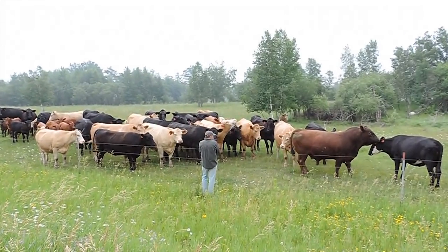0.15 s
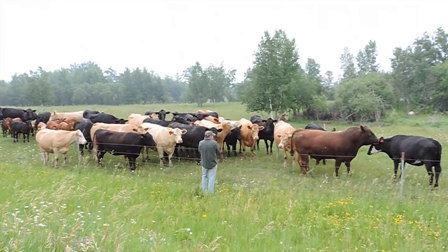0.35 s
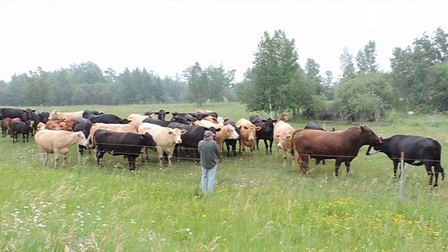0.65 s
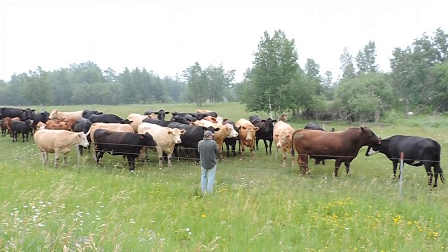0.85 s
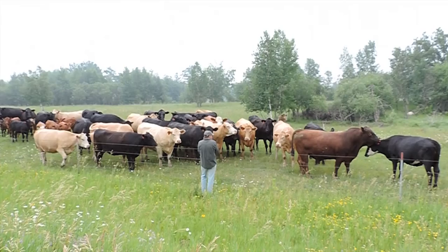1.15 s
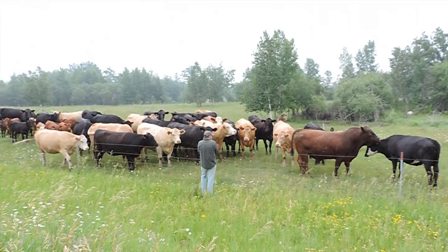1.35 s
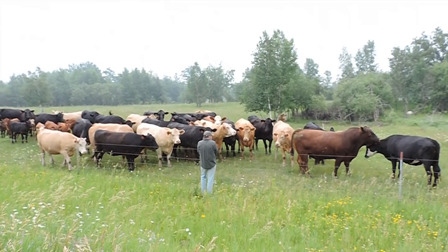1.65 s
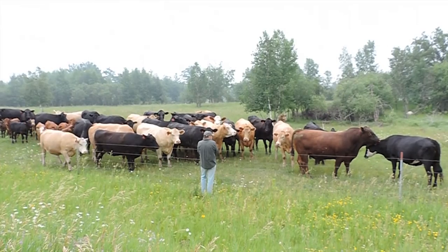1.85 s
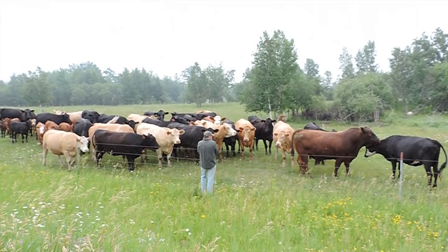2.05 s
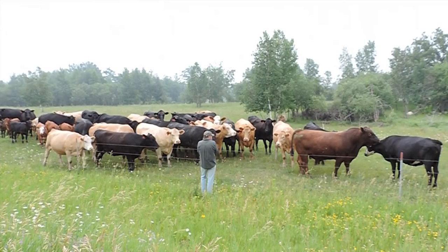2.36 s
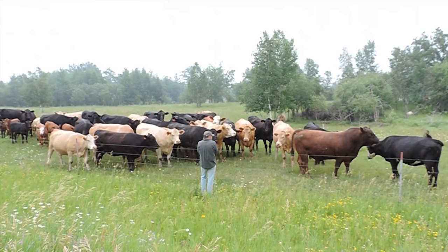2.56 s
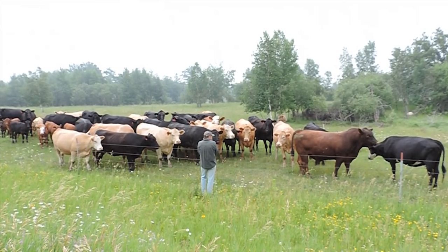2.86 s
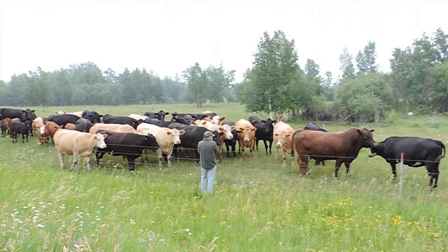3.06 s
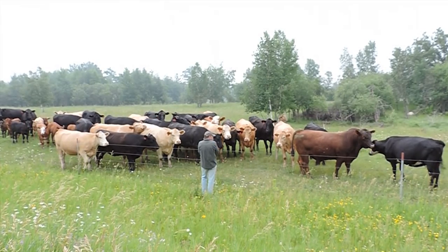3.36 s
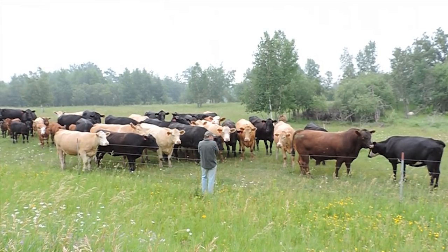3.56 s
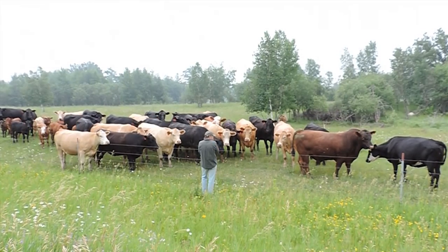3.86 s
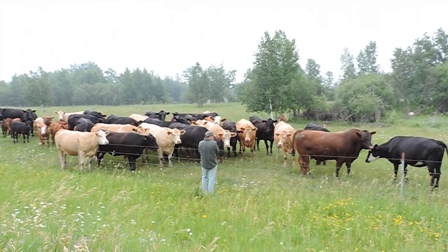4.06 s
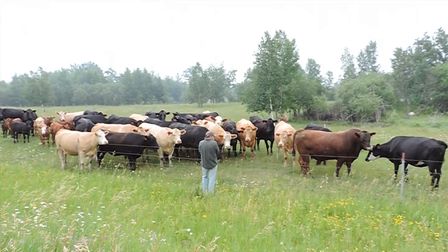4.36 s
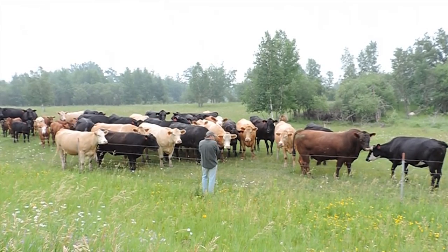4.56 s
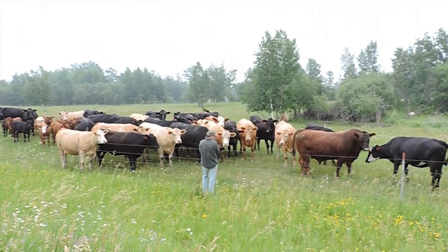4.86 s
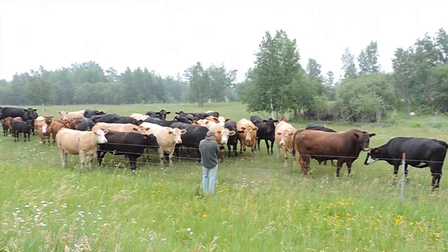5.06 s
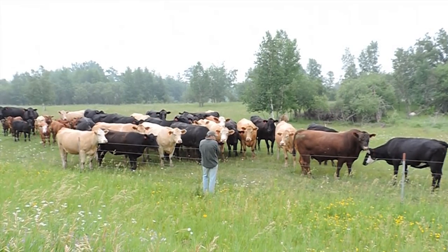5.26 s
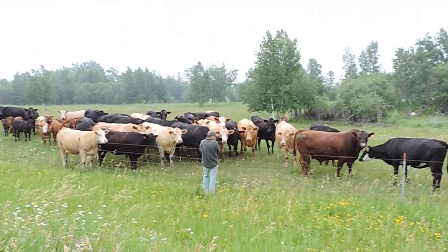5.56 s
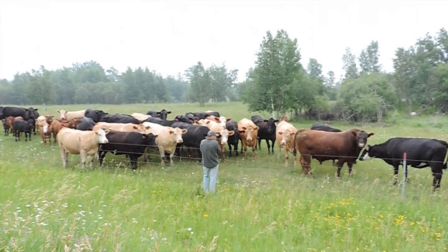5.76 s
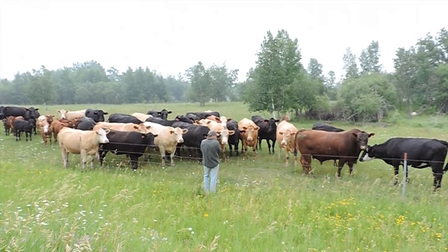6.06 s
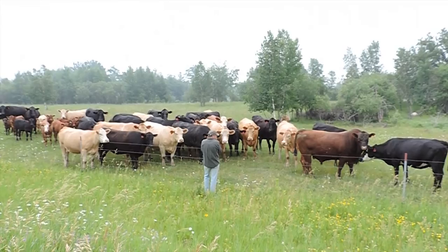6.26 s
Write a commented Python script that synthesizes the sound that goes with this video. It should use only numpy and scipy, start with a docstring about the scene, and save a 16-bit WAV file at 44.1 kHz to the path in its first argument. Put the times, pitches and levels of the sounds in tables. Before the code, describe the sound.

A quiet open pasture, heard in stereo from some distance, lasts a little over six seconds. Soft low air, a fine leafy hiss and a barely present low drone continue throughout. At 0.2-0.45 s come faint hoarse bird calls on the right and a tiny hoof crunch. At 1.27 s a dull hoof step falls, and a cow hums very low and faintly until about 2.35 s. Thin high whistles at 1.06, 1.4 and 1.8 s lead to bright upward slurs at 1.9-2.15 s. A rasping note and evenly spaced falling chips run from 2 to 3.05 s, with two soft rising blips, then hoarse calls and a distant buzz until 3.65 s. From 4.03 s a moo climbs nasally, opens near 4.8 s, bellows loudest around 5.3-5.9 s, and drops in a creaky grunt by 6.09 s. A light echo, hoarse huff and bird calls finish.

```python
"""Summer pasture: a standing herd, a soft wash of air and leaves, small birds, a faint echo off the tree line.
A cow hums very low; later a long moo climbs, opens into a loud bellow and drops away as the mouth shuts.
Cow voices are sums of harmonics shaped by nose and mouth; bird notes are gliding, trembling sines.
Air is shaped noise plus a low sine; hooves are damped noise bursts; the echo is sparse decaying taps."""
import sys
import numpy as np
from scipy import signal
from scipy.io import wavfile
from scipy.ndimage import uniform_filter1d, map_coordinates

SR = 44100
rng = np.random.default_rng(int(sys.argv[2]) if len(sys.argv) > 2 else 0)


def to_wav(sig):
    """Store sig (one row per channel, or 1-D mono) as 16-bit WAV at the path in sys.argv[1].

    Samples outside -1..1 are clipped; the rate is SR.
    """
    pcm = np.clip(np.atleast_2d(sig), -1, 1) * 32767
    pcm = np.round(pcm).astype(np.int16)
    wavfile.write(sys.argv[1], SR, pcm.T)  # frames by channels


N = 282681


def gain_of(db):
    """Decibels to amplitude."""
    return 10 ** (np.asarray(db) / 20)


def evened(x):
    """Scales to rms 1."""
    return x / np.sqrt(np.mean(x ** 2) + 1e-20)


def read(points, hz):
    """Reads a spectrum on a log-frequency axis."""
    f, value = np.transpose(points)
    return np.interp(np.log(hz + 1), np.log(f + 1), value)


def follow(rows, t):
    """Reads every column of a curve table at the times t."""
    s, *columns = np.transpose(rows)
    return [np.interp(t, s, column) for column in columns]


def add(mix, s, sound):
    """Mixes a sound in at time s."""
    part = mix[..., round(s * SR):][..., :sound.shape[-1]]
    part += sound[..., :part.shape[-1]]


def drift(size, rate_hz):
    """Smooth random wavering of rms 1, with 2 * rate_hz random knots a second."""
    knots = rng.standard_normal(4096)
    at = np.arange(size) * 2 * rate_hz / SR
    return evened(map_coordinates(knots, [at], order=2, mode="wrap"))


def phase(hz):
    """Running phase of a varying frequency, rad."""
    return 2 * np.pi * np.cumsum(hz) / SR


def panned(sound, pan_db):
    """Level difference left minus right, split between both sides."""
    return gain_of([[pan_db / 2], [-pan_db / 2]]) * sound


# left-right likeness of the air: f/Hz, correlation/1
LIKENESS = [(25, .9), (60, 1), (110, 0.75), (190, 0.77), (340, 0.67), (620, 0.66), (1110, 0.47),
            (1980, 0.6), (3550, 0.13), (6350, 0.51), (11400, 0.53)]


def wash(spectrum, db, patch_db, size):
    """Steady noise with drifting time-frequency patches, partly alike in both ears."""
    hop, hz = size // 4, np.fft.rfftfreq(size, 1 / SR)
    a, b, c, d, patches = rng.standard_normal((5, len(hz), N // hop + 5))
    patches = uniform_filter1d(patches, size=8, axis=0)
    patches = evened(uniform_filter1d(patches, size=8, axis=1))
    same = np.clip(read(LIKENESS, hz), -1, 1)[:, None]
    left = a + 1j * b
    right = same * left + np.sqrt(1 - same ** 2) * (c + 1j * d)
    z = np.array([left, right]) * gain_of(read(spectrum, hz)[:, None] + patch_db * patches)
    noise = signal.istft(z, nperseg=size, noverlap=size - hop)[1][:, :N]
    return gain_of(db) * evened(noise)


def drone(hz=58.8, db=-67):
    """A faint low sine, barely wavering in pitch."""
    return gain_of(db) * evened(np.sin(phase(hz + .5 * drift(N, 2.6))))


# spectrum shape of the low air: f/Hz, relative density/dB per Hz
AIR_SHAPE = [(12, -27), (20, 0.5), (32, -6), (65, -4), (81, -3.5), (185, -5.5), (223, -6.5), (253, -8.5),
             (908, -12.5), (988, -11.5), (1220, -13.5), (2190, -17), (2650, -18), (3000, -21),
             (3900, -58.5), (6600, -120)]
# spectrum shape of the high hiss: f/Hz, relative density/dB per Hz
HISS_SHAPE = [(2600, -32), (3100, 0.5), (4000, -1), (4800, -5), (5400, -0.5), (5850, -2), (6150, -7.5),
              (8000, -9), (11500, -11.5)]


def open_air():
    """Low wash, finer-grained high hiss and drone."""
    low = wash(AIR_SHAPE, db=-57.5, patch_db=2.06, size=4096)
    high = wash(HISS_SHAPE, db=-66.5, patch_db=2.0, size=512)
    return low + high + drone()


# echo strength of the tree line: f/Hz, relative level/dB
ECHO_LEVEL = [(100, -18.5), (200, -18.5), (450, -24), (800, -14.5), (1200, -9), (3000, -6), (8000, -13.5)]
# echo decay: f/Hz, t60/s
ECHO_DECAY = [(150, 0.57), (900, 3.53), (3000, 5.4), (8000, .7)]


def tree_line(x, spread=0.15, slot=20):
    """Sparse reflections, one random-sign tap per slot of samples; each band dies at its own speed."""
    taps = np.zeros((2, 2 * SR))
    at = np.arange(900, 2 * SR - slot, slot)
    shape = (2, len(at))
    np.put_along_axis(taps, at + rng.integers(0, slot, shape), rng.choice([-1., 1.], shape), 1)
    hz, t, z = signal.stft(taps, SR, nperseg=256)
    t60_s = read(ECHO_DECAY, hz)[:, None]
    energy = SR / slot * t60_s / np.log(10 ** 6)  # of an endless decay
    z = z * np.exp(-np.log(1000) * t / t60_s) / np.sqrt(energy)
    z = z * gain_of(read(ECHO_LEVEL, hz))[:, None]
    response = signal.istft(z, SR, nperseg=256)[1]
    mid, side = signal.fftconvolve(x[None], response, axes=1)[:, :N]
    return np.array([mid + spread * side, mid - spread * side])


def foliage(x, sway_hz=10):
    """Swaying leaves keep shifting the echo between three paths."""
    weights = np.array([drift(N, sway_hz) for _ in range(3)])
    weights /= np.sqrt(np.sum(weights ** 2, 0) + 0.035)
    return sum(weight * tree_line(x) for weight in weights)


def note(length_s, hz, db, glide, rasp):
    """Sine gliding through hz by a log share of its pitch; a fast pitch tremble (rms share) makes it raspy."""
    u = np.linspace(-.5, .5, int(length_s * SR))
    pitch_hz = hz * np.exp(glide * u) * (1 + rasp * drift(len(u), 350))
    tone = np.sin(phase(pitch_hz)) * signal.windows.tukey(len(u), .6)
    return gain_of(db) * evened(tone)


# distant buzzing song: t/s, length/s, f/Hz, level/dB, throb/Hz, left-right/dB
BUZZ_NOTES = [(3.22, .35, 5150, -73, 42, -2), (3.25, .41, 2720, -68, 42, -6)]


def buzzes():
    """Held tones chopped into quick pips by a squared sine."""
    out = np.zeros((2, N))
    for s, length_s, hz, db, throb_hz, pan_db in BUZZ_NOTES:
        t = np.arange(int(length_s * SR)) / SR
        tone = np.sin(phase(hz * (1 + .008 * drift(len(t), 200))))
        pips = np.sin(np.pi * throb_hz * t) ** 2
        sound = gain_of(db) * evened(tone * pips * signal.windows.tukey(len(t), .1))
        add(out, s, panned(sound, pan_db))
    return out


# hoarse calls: t/s, length/s, f/Hz, level/dB, glide/1
HOARSE_CALLS = [(0.195, 0.032, 2980, -76, -.08), (0.304, .15, 2653, -67.5, -.15),
                (2.568, 0.018, 2700, -68.5, -0.12), (2.911, 0.047, 1543, -67.5, -0.024),
                (2.971, 0.071, 2440, -63, -.07), (3.164, 0.02, 2560, -66, -.06),
                (5.922, 0.039, 3730, -70, -.18), (6.233, 0.098, 2710, -66.5, -.33),
                (6.301, .105, 2920, -69, .32)]


def bird_calls():
    """Short raspy glides, off to the right."""
    out = np.zeros((2, N))
    for s, length_s, hz, db, glide in HOARSE_CALLS:
        add(out, s, panned(note(length_s, hz, db, glide, rasp=0.05), pan_db=-10.5))
    return out


def chips(count=7, start_s=2.273, gap_s=.1222, first_db=-66.5, fade_db=-.5, scatter_db=2):
    """A rasping note leads into evenly spaced falling chips, fading with some scatter in strength."""
    out = np.zeros(N)
    add(out, 2, note(length_s=0.5, hz=4901, db=-74, glide=0, rasp=0.042))
    for i in range(count):
        db = first_db + i * fade_db + scatter_db * rng.standard_normal()
        add(out, start_s + i * gap_s, note(length_s=.028, hz=5040, db=db, glide=-0.254, rasp=0.0043))
    return out


# thin, nearly level whistles: t/s, length/s, f/Hz, level/dB, left-right/dB
WHISTLE_NOTES = [(1.059, .12, 7060, -70, -11), (1.421, .17, 6980, -69.5, -7),
                 (1.82, 0.133, 6900, -66.5, -2)]


def whistles():
    """Nearly pure tones open a small bird's song."""
    out = np.zeros((2, N))
    for s, length_s, hz, db, pan_db in WHISTLE_NOTES:
        add(out, s, panned(note(length_s, hz, db, glide=0.0154, rasp=.002), pan_db))
    return out


# upward slurs: t/s, f/Hz, level/dB, glide/1
SLUR_NOTES = [(1.922, 7980, -57, .28), (2.031, 8440, -61, .15)]
SLUR_S, SLUR_RASP = .11, 0.021
FLICK_S, FLICK_PITCH_RATIO, FLICK_REL_DB = .016, 1.2, -18


def slurs():
    """Upward glides end the song, each closing on a faint higher flick."""
    out = np.zeros(N)
    for s, hz, db, glide in SLUR_NOTES:
        add(out, s, note(SLUR_S, hz, db, glide, SLUR_RASP))
        flick = note(FLICK_S, hz * FLICK_PITCH_RATIO, db + FLICK_REL_DB, 0, SLUR_RASP)
        add(out, s + SLUR_S - FLICK_S, flick)
    return out


def songbirds():
    """All bird sounds, stereo."""
    return buzzes() + bird_calls() + chips() + whistles() + slurs()


# hoof steps: t/s, level before decay/dB, f/Hz, noise width/Hz, decay/s
HOOF_STEPS = [(.311, -49, 970, 640, 0.0076), (.323, -50, 1066, 715, 0.0058), (1.271, -45, 146, 139, 0.0082),
              (1.275, -60.5, 4250, 890, 0.017)]


def hooves():
    """Hoof on turf: a band of noise, quick onset, exponential damping."""
    out = np.zeros(N)
    t = np.arange(SR // 8) / SR
    for s, db, hz, width_hz, decay_s in HOOF_STEPS:
        crunch = drift(len(t), width_hz / 2) * np.cos(2 * np.pi * hz * t)
        crunch = crunch + drift(len(t), width_hz / 2) * np.sin(2 * np.pi * hz * t)
        damping = np.exp(-t / decay_s) * (1 - np.exp(-t / 0.00029))
        add(out, s, gain_of(db) * evened(crunch) * damping)
    return out


# soft rising blips from the herd: t/s, f/Hz, level/dB
BLIP_NOTES = [(2.317, 306, -59.5), (2.511, 366, -56)]


def blips_and_huff():
    """Two short rising notes, and one hoarse huff after the moo."""
    out = np.zeros(N)
    for s, hz, db in BLIP_NOTES:
        add(out, s, note(length_s=0.041, hz=hz, db=db, glide=0.55, rasp=0.022))
    add(out, 6.198, note(length_s=.055, hz=546, db=-52, glide=-0.072, rasp=0.0973))
    return out


# closed-mouth call: t/s, f/Hz, level before level_db/dB
MURMUR_CURVE = [(1.27, 57.9, -57), (1.358, 58.2, -69), (1.39, 58.8, -56.5), (1.622, 62.6, -61.5),
                (1.906, 63.06, -56.5), (1.974, 62, -63.5), (2.14, 61.6, -55.5), (2.36, 60.7, -66)]


def murmur(level_db=1, overtones_db=(0, -19, -19, -23, -27, -24), jitter=0.01):
    """A low hum through the nose, nearly all fundamental."""
    t = np.arange(MURMUR_CURVE[0][0], MURMUR_CURVE[-1][0], 1 / SR)
    pitch_hz, db = follow(MURMUR_CURVE, t)
    angle = phase(pitch_hz * (1 + jitter * drift(len(t), 14.0)))
    hum = sum(gain_of(d) * np.cos((k + 1) * angle) for k, d in enumerate(overtones_db))
    return t[0], gain_of(db + level_db) * evened(hum) * signal.windows.tukey(len(t), .1)


def formant(hz, centre_hz, width_hz, steepness=4):
    """Shares of power that a steep resonance gives to the harmonics (rows)."""
    power = 1 / (1 + ((hz - centre_hz) / width_hz) ** 2) ** steepness
    return power / power.sum(0)


def notch(hz, centre_hz, width_hz, depth_db):
    """Gain of an antiresonance."""
    return gain_of(depth_db * np.exp(-((hz - centre_hz) / width_hz) ** 2))


def swell(t, s, half_length_s, db):
    """A smooth rise and fall of level around the time s, dB."""
    return db * np.exp(-((t - s) / half_length_s) ** 2)


# pitch and nasal fundamental: t/s, f/Hz, level/dB
MOO_CURVE = [(4.03, 60.47, -71), (4.14, 71.23, -51.5), (4.27, 80.9, -47.5), (4.38, 88.4, -45),
             (4.64, 128.8, -45.5), (4.73, 142.3, -41.5), (4.8, 162, -37), (4.84, 164.8, -34.5),
             (4.94, 173.4, -35.5), (5.0, 176.6, -32.5), (5.33, 193.5, -24), (5.55, 195.7, -22.5),
             (5.87, 190.5, -24.5), (5.97, 176.8, -30.5), (6.0, 163.5, -32.5), (6.04, 117.8, -44),
             (6.05, 110, -41.5), (6.09, 93, -62)]
# overtone prominence as the mouth widens and narrows: t/s, level/dB
BRIGHTNESS_CURVE = [(4.03, -4), (4.35, -9.5), (4.62, -2.5), (4.8, -2), (4.95, 2), (5.36, -5.5), (5.6, -18),
                    (5.78, -10), (5.94, -0.5), (6.02, -3)]
# main formant, rising as the jaw drops: t/s, f/Hz
JAW_CURVE = [(4.3, 680), (4.8, 680), (4.89, 742), (5.05, 703), (5.4, 796.5), (5.8, 764), (5.97, 862)]
# low, main, third, fourth formant, brassy edge: level re fundamental/dB, slope/dB per dB brightness
RADIATION_ROWS = [(-9.5, 1.34), (-13, 0), (-20, 0.54), (-21.5, 1.63), (-28, 0.84)]
# pushes that make the main formant blare: t/s, half length/s, level/dB
BLARE_PUSHES = [(4.914, 0.062, 13.5), (5.322, 0.063, 6.5), (5.973, 0.038, 7.5)]
# nasal overtones, jumping in the closing grunt: t/s, level/dB
NASAL_CURVE = [(4.1, 2), (4.75, -0.5), (5.1, 3.5), (5.6, -2), (5.99, -6), (6.04, 15.5), (6.09, 12.5)]
# nose response, ringing near 200 Hz: f/Hz, level/dB
NOSE_RESPONSE = [(70, -8.5), (120, -5), (165, -0.5), (205, 0), (240, -.5), (295, -17.5), (340, -8),
                 (400, -11), (600, -30), (1200, -64.5)]
# upper throat resonances, the brassy edge: f/Hz, relative level/dB
EDGE_RESPONSE = [(1200, -43.5), (1550, -20.5), (1730, -3), (1930, 9), (2130, -6.5), (2340, 4.5),
                 (2520, -8.5), (2650, 2.5), (2900, -19), (3120, -5), (3500, -30.5), (4800, -24.5)]
# lips press, pop open, finally shut; gain on the mouth's sound: t/s, level/dB
LIP_CURVE = [(4.74, -3), (4.779, -22.5), (4.789, 4.5), (4.82, 0), (5.99, -2), (6.03, 6), (6.07, -10)]
FOLD_DB_PER_OCTAVE = -9
EDGE_BLARE_SHARE = 0.32  # of a blare's dB
REST_HZ, FULL_HZ, LARYNX_DROP = 148, 180, 0.1  # pitches; share by which resonances lie lower at rest
LOW_HZ, LOW_WIDTH_HZ, MAIN_WIDTH_HZ = 605, 53, 208
THIRD_FULL_HZ, THIRD_WIDTH_HZ = 1137, 58  # centre with the larynx up
FOURTH_FULL_HZ, FOURTH_WIDTH_HZ = 1437, 270
PHASE_LAG_SCALE = 0.75  # formant ringing against a plain resonance
RASP, EDGE_RASP, CREAK = .05, .18, .16  # fraying depth: middle harmonics, high ones, extra at low pitch


def moo(jitter=0.003, flutter_db=2.06, edge_flutter_db=4.5):
    """Fold harmonics sound through the nose throughout, and through mouth formants gated by the lips."""
    t = np.arange(MOO_CURVE[0][0], MOO_CURVE[-1][0], 1 / SR)
    pitch_hz, first_db = follow(MOO_CURVE, t)
    (brightness_db,), (main_hz,) = follow(BRIGHTNESS_CURVE, t), follow(JAW_CURVE, t)
    levels_db = [first_db + db + slope * brightness_db for db, slope in RADIATION_ROWS]
    low_db, main_db, third_db, fourth_db, edge_db = levels_db
    blare_db = sum(swell(t, *row) for row in BLARE_PUSHES)
    main_db = main_db + blare_db
    edge_db = edge_db + EDGE_BLARE_SHARE * blare_db
    third_db = third_db + swell(t, s=5.22, half_length_s=0.13, db=8.6)
    # the larynx rises with pitch and lifts the upper resonances
    lift = 1 - LARYNX_DROP * np.clip((FULL_HZ - pitch_hz) / (FULL_HZ - REST_HZ), 0, 1)

    k = np.arange(1, 27)[:, None]
    hz = k * pitch_hz
    folds_db = first_db + FOLD_DB_PER_OCTAVE * np.log2(k) + (k > 1) * follow(NASAL_CURVE, t)[0]
    nose = gain_of(folds_db + read(NOSE_RESPONSE, hz) - read(NOSE_RESPONSE, pitch_hz)) ** 2
    edge = gain_of(read(EDGE_RESPONSE, hz)) ** 2
    mouth, lag = gain_of(edge_db) ** 2 * edge / edge.sum(0), 0
    for db, centre_hz, width_hz in [(low_db, LOW_HZ, LOW_WIDTH_HZ),
                                    (main_db, main_hz, MAIN_WIDTH_HZ),
                                    (third_db, THIRD_FULL_HZ * lift, THIRD_WIDTH_HZ),
                                    (fourth_db, FOURTH_FULL_HZ * lift, FOURTH_WIDTH_HZ)]:
        mouth = mouth + gain_of(db) ** 2 * formant(hz, centre_hz, width_hz)
        turn = np.arctan((hz - centre_hz) / width_hz) + np.arctan(centre_hz / width_hz)
        lag = lag + PHASE_LAG_SCALE * turn
    # the nasal side branch cancels a narrow band of the mouth's sound
    branch = notch(hz / lift, centre_hz=1355, width_hz=44, depth_db=-12)
    power = nose + mouth * (gain_of(follow(LIP_CURVE, t)[0]) * branch) ** 2

    angle = phase(pitch_hz * (1 + jitter * drift(len(t), 45)))
    slack = np.clip((165 - pitch_hz) / 30, 0, 1)  # slack folds at low pitch creak
    voice = np.zeros(len(t))
    for row, order in enumerate(k[:, 0]):
        # high harmonics waver more, and turbulence at the folds frays them
        middle, high = np.clip((order - 2) / 2, 0, 1), np.clip((order - 5) / 4, 0, 1)
        range_db = (flutter_db + high * edge_flutter_db) * (order > 1)
        waver = gain_of(range_db * np.tanh(drift(len(t), 9)))
        depth = middle * (RASP + CREAK * slack) + high * EDGE_RASP
        turbulence = drift(len(t), 70) + 1j * drift(len(t), 70)
        fray = (1 + depth * turbulence) / np.sqrt(1 + 2 * depth ** 2)
        harmonic = fray * np.exp(1j * (order * angle - lag[row]))
        voice += (np.sqrt(2 * power[row]) * waver * harmonic).real
    return t[0], voice * signal.windows.tukey(len(t), .015)


def herd():
    """Small noises of the standing cattle, the hum and the moo, mono."""
    out = hooves() + blips_and_huff()
    add(out, *murmur())
    add(out, *moo())
    return out


def scene():
    """Cows straight ahead, birds around them, their echo, and the open air behind."""
    cows, birds = herd(), songbirds()
    return cows + birds + foliage(cows + birds.mean(0)) + open_air()


def record(dry, cut_hz=11900):
    """The recorder's band limit: a linear-phase low-pass."""
    low_pass = signal.firwin(511, cut_hz, window=("kaiser", 9), fs=SR)
    return signal.oaconvolve(dry, low_pass[None], "same")


dry = scene()
out = record(dry)
to_wav(out)
```